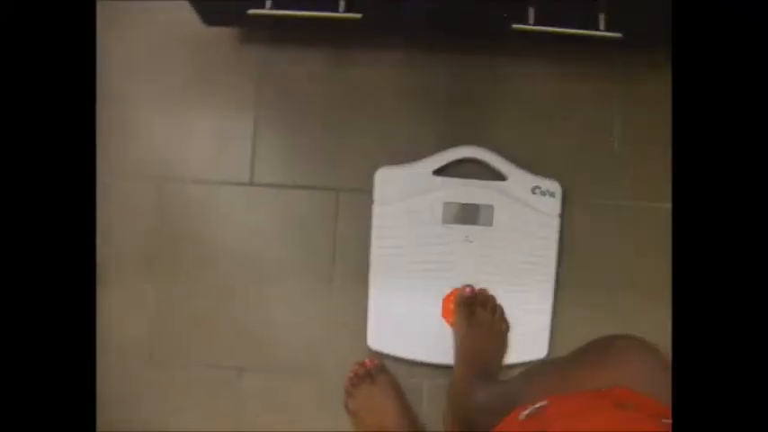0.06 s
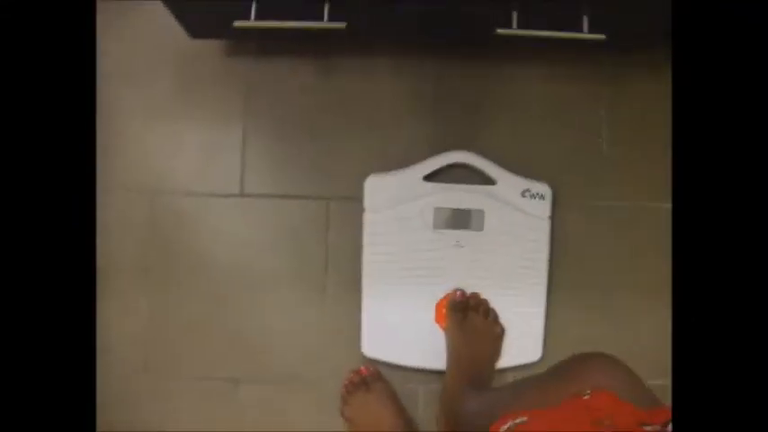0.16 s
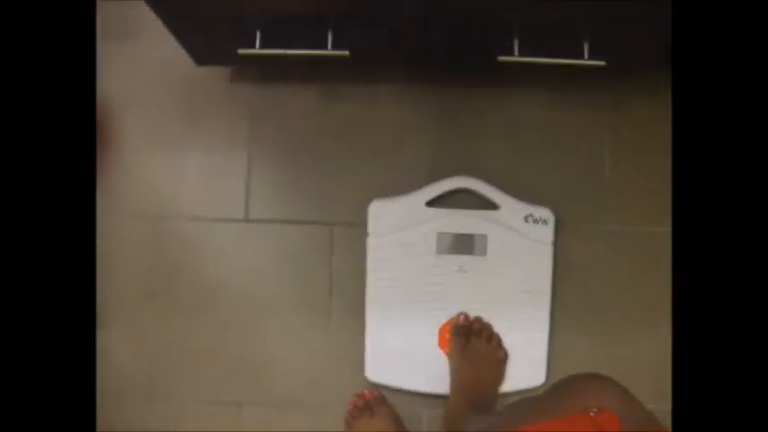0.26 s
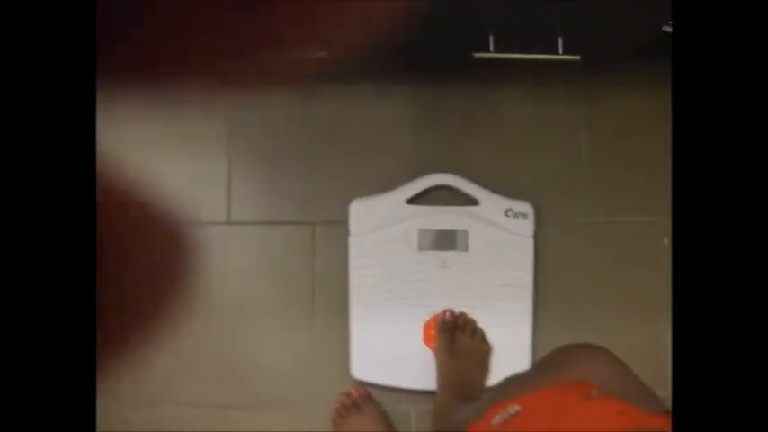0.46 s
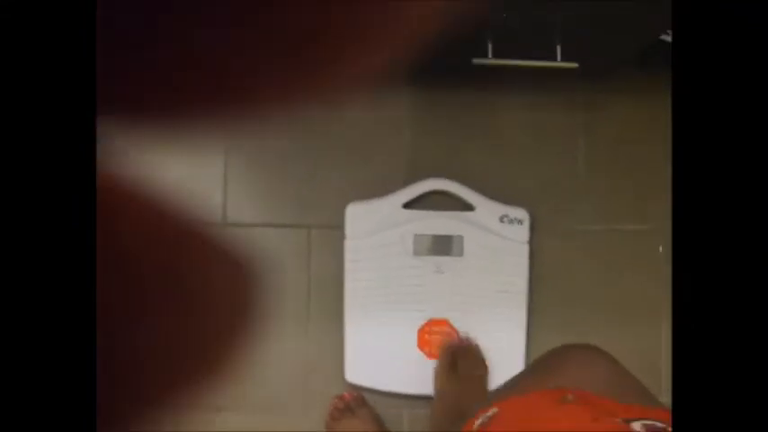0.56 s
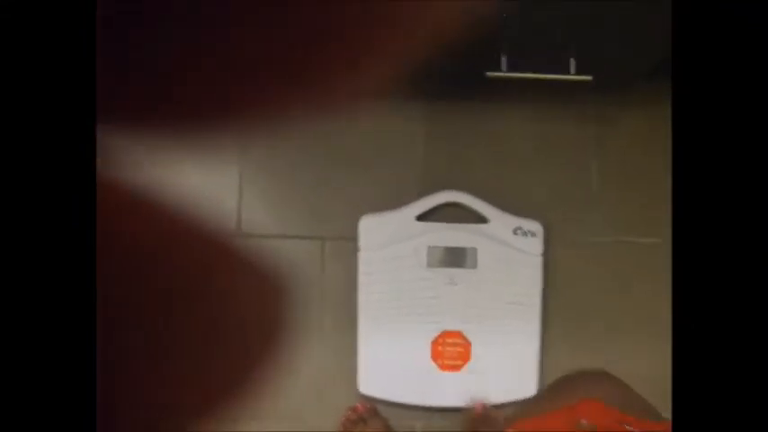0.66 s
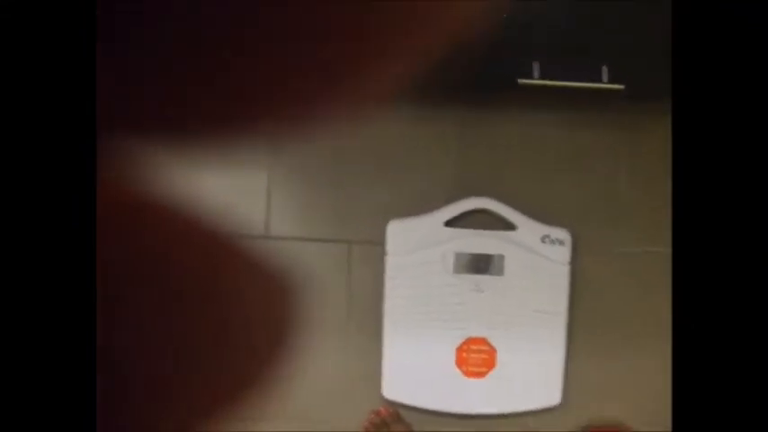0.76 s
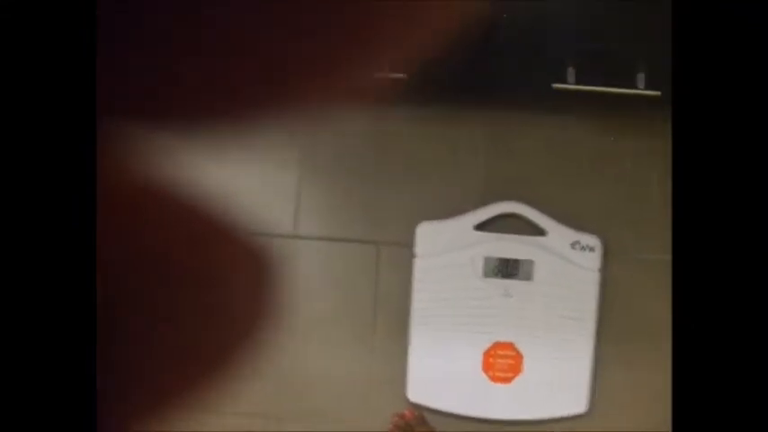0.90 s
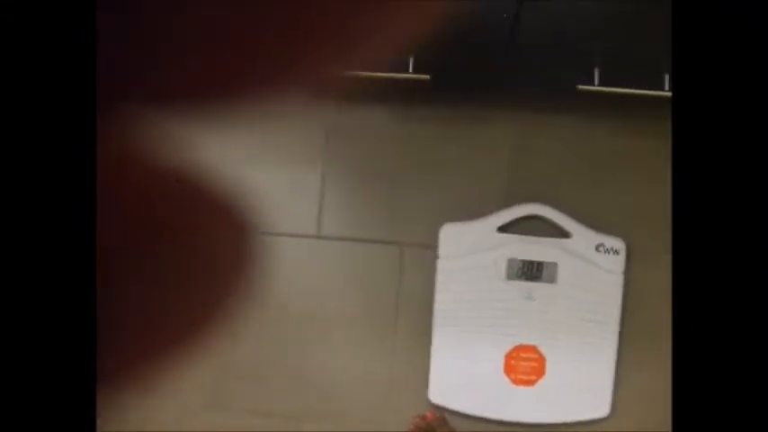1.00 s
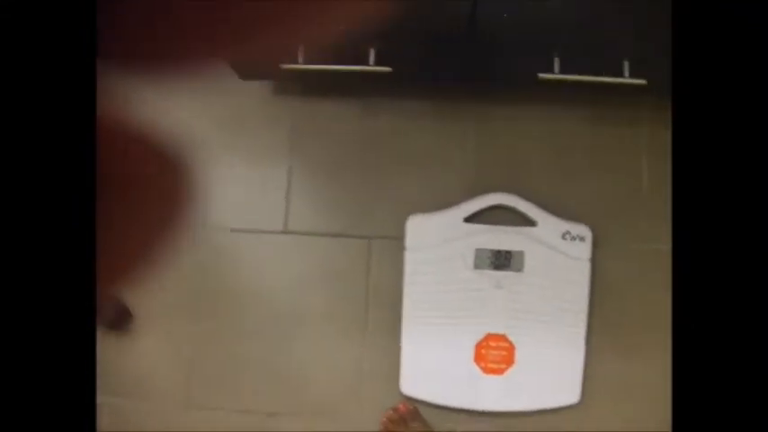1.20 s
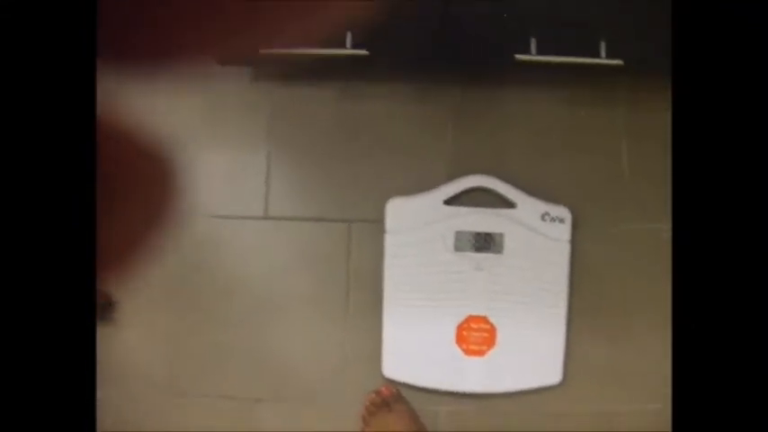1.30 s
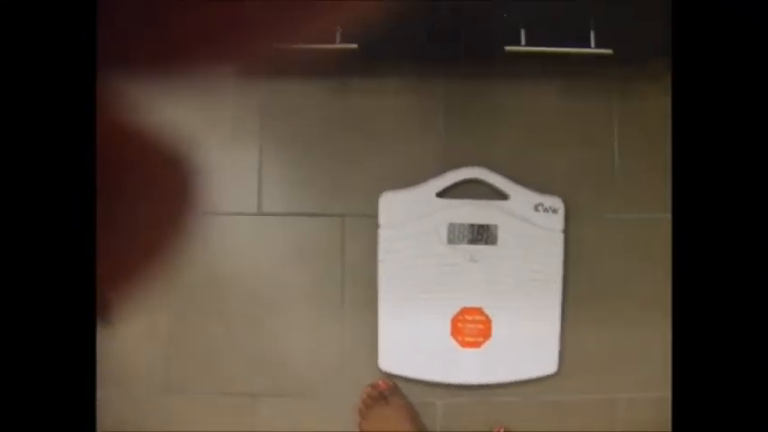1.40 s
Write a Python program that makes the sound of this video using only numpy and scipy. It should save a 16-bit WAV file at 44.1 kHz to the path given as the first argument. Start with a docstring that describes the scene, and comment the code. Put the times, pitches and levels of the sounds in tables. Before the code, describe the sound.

A bare foot taps a plastic bathroom scale, which clacks and then briefly rattles.

```python
"""A small, hard room with a tiled floor: a bare foot taps a plastic bathroom scale. The case clacks
down in a few quick contacts that ring its modes, the foot shifts on it, and the case rattles as the
foot lifts off. Small knocks and rubs of skin sound close to the microphone. The room rings after
each blow, over a faint electric hum and hiss."""
import sys
import numpy as np
from scipy import signal
from scipy.fft import rfft, irfft
from scipy.io import wavfile

SR = 44100
rng = np.random.default_rng(int(sys.argv[2]) if len(sys.argv) > 2 else 0)


def store_wav(level_fs):
    """Save 16-bit WAV to argv[1]."""
    pcm = np.round(np.clip(np.atleast_2d(level_fs), -1, 1) * 32767)
    wavfile.write(sys.argv[1], SR, pcm.T.astype(np.int16))


N = 63945


def amp(db):
    """Decibels to gain."""
    return 10 ** (np.asarray(db) / 20)


def unit(x):
    """Scales to rms 1."""
    return x / np.sqrt(np.mean(x ** 2) + 1e-20)


def curve_at(points, hz):
    """Reads a curve on a log-frequency axis."""
    f, value = np.transpose(points)
    return np.interp(np.log(hz + 1), np.log(f + 1), value)


def add(mix, s, sound):
    """Mixes a sound in at time s."""
    part = mix[max(round(s * SR), 0):][:len(sound)]
    part += sound[:len(part)]


def colour(x, eq, top_hz=8300):
    """Shapes x with an EQ curve, cut off at top_hz, at rms 1."""
    hz = np.fft.rfftfreq(len(x), 1 / SR)
    return unit(irfft(rfft(x) * amp(curve_at(eq, hz)) * (hz < top_hz), len(x)))


def fade(t, t60):
    """Exponential decay, 60 dB down at t60."""
    return np.exp(-np.log(1000) * t / t60)


def ring(modes, travel_s=0):
    """Struck modes; bending waves bring the high ones first, taking travel_s at 1 kHz."""
    out = np.zeros(SR // 2)
    for hz, db, t60 in modes:
        t = np.maximum(np.arange(len(out)) / SR - travel_s * np.sqrt(1000 / hz), 0)
        out += amp(db) * fade(t, t60) * np.sin(2 * np.pi * hz * t)
    return out


def burst(eq, t60):
    """A short dying puff of coloured noise."""
    t = np.arange(SR // 2) / SR
    return colour(rng.standard_normal(len(t)), eq) * fade(t, t60)


def slips(per_s, spread_db):
    """A random train of tiny slips of uneven size."""
    size = amp(spread_db * np.minimum(rng.exponential(1, N), 3))
    return unit(size * rng.choice([-1, 1], N) * (rng.random(N) < per_s / SR))


# EQ of the noise bed: f/Hz, relative level/dB
HISS_EQ = [(20, 9), (40, -24.5), (100, -8), (150, -12.5), (220, -6), (330, -5.5), (430, -4), (560, -12),
           (900, -14), (2000, -19), (4000, -20.5), (7500, -21)]
def hiss():
    """A steady bed of air and microphone hiss."""
    return amp(-45) * colour(rng.standard_normal(N), HISS_EQ)


# hum tones, mains fundamental first: f/Hz, level/dB
HUM_TONES = [(59.2, -48.5), (199.2, -62), (296.1, -48), (317.6, -71.5), (421, -57), (839.8, -67.5)]
# slow level change of the upper tones: t/s, gain/dB
HUM_LEVEL_CURVE = [(0, -0.5), (.6, -2.5), (.8, 0), (1.45, 1.8)]
def hum(waver_depth=0.12, waver_hz=2.3):
    """A steady mains hum whose upper tones waver in level and phase."""
    t, hz = np.arange(N) / SR, np.fft.rfftfreq(N, 1 / SR)
    slow = np.exp(-(hz / waver_hz) ** 2)
    ride = amp(np.interp(t, *np.transpose(HUM_LEVEL_CURVE)))
    out = np.zeros(N)
    for k, (tone_hz, db) in enumerate(HUM_TONES):
        swell, drift = (unit(irfft(rfft(rng.standard_normal(N)) * slow, N)) for _ in range(2))
        waver = (1 + waver_depth * (swell + 1j * drift)) * ride if k else 1
        tone = np.exp(2j * np.pi * (tone_hz * t + rng.random()))
        out += np.sqrt(2) * amp(db) * (waver * tone).real
    return out


# decay of the reverb tail: f/Hz, t60/s
TAIL_DECAY = [(200, 0.57), (500, 0.4347), (1400, 0.41), (3000, 0.47), (7500, 0.36)]
# EQ of the tail: f/Hz, gain/dB
TAIL_EQ = [(100, -19), (230, 2), (380, -4), (520, 2), (680, -3), (950, 1.5), (1450, 1), (1900, -2),
           (3200, -2), (7500, -5)]
# standing waves of the room: f/Hz, level/dB, t60/s
ROOM_MODES = [(235, -61.5, 0.75), (466, -57, 0.31), (565, -54, 0.31), (883, -72, 0.53), (943, -57, .38),
              (1129, -55, 0.35), (1475, -60, 0.58)]
# early reflections off cabinets and walls: t/s, level/dB
REFLECTIONS = [(0.0116, -16), (.029, -16), (0.0392, -15)]
def room(send, predelay_s=0.008, build_s=0.01):
    """The tiled room's reverb: a diffuse tail, standing waves and early reflections."""
    t = np.arange(SR) / SR
    hz, when, noise = signal.stft(rng.standard_normal(SR), SR, nperseg=256)
    decay = fade(when, curve_at(TAIL_DECAY, hz)[:, None])
    tail = signal.istft(noise * decay, SR, nperseg=256)[1][:SR]
    tail *= np.minimum(t / build_s, 1)
    tail *= amp(-6.5) / np.linalg.norm(tail)
    eq = amp(curve_at(TAIL_EQ, np.fft.rfftfreq(SR, 1 / SR)))
    response = np.zeros(SR)
    add(response, predelay_s, irfft(rfft(tail) * eq, SR)[:SR // 2])
    add(response, predelay_s, ring(ROOM_MODES))
    for delay_s, db in REFLECTIONS:
        add(response, delay_s, amp(db) * np.hanning(15) / 7)  # a rounded pulse dulls the echo
    return signal.fftconvolve(send, response)[:N]


# rub cues: peak t/s, half length/s, level/dB, tilt/(dB per octave)
RUB_CUES = [(0.296, 0.021, -44, 4), (0.338, .026, -46, .5), (0.454, 0.046, -47.5, -3),
            (0.905, 0.0064, -49, 0), (0.945, 0.0059, -49, -0.5)]
# EQ of sliding skin: f/Hz, relative level/dB
RUB_EQ = [(300, -7), (1200, 6), (2000, -4.5), (3300, 4), (4600, 1.5), (7500, -2.5)]
def skin_rubs():
    """Skin slides in soft swells of fine grains, some brighter than others."""
    t, out = np.arange(N) / SR, np.zeros(N)
    for s, half_s, db, tilt_db in RUB_CUES:
        eq = [(hz, level + tilt_db * np.log2(hz)) for hz, level in RUB_EQ]
        swell = amp(db) * np.exp(-.5 * ((t - s) / half_s) ** 2)
        out += swell * colour(slips(per_s=2500, spread_db=2.5), eq)
    return out


# EQ of the tick: f/Hz, relative level/dB
TICK_EQ = [(200, 7.5), (1300, 13.5), (2000, -9.5), (3300, -0.5), (4600, 1), (7500, 3.5)]
def tick(db):
    """The bright noise transient on a knock or clack."""
    return amp(db) * burst(TICK_EQ, t60=0.039)


# knock cues: t/s, level/dB, f/Hz, t60/s, tick level/dB
KNOCK_CUES = [(0.0157, -32, 680, .02, -33), (0.058, -27.5, 577, 0.021, -55),
              (0.2725, -42, 604, 0.0085, -41.5), (0.2821, -29, 524, 0.011, -40),
              (.5048, -27.5, 485, 0.028, -57.5)]
def knocks():
    """Small close knocks, each one damped mode topped with a tick."""
    out = np.zeros(N)
    for s, db, hz, t60, tick_db in KNOCK_CUES:
        add(out, s, tick(tick_db) - ring([(hz, db, t60)]))
    return out


# body of the clack: f/Hz, level/dB, t60/s
CLACK_MODES = [(305, -23.5, 0.032), (832, -17.5, 0.016), (1130, -28.5, 0.014), (1370, -32, 0.012)]
def shift_clack():
    """The shifting foot sets off one dry clack: a tick over a few short modes."""
    out = np.zeros(N)
    add(out, s=0.3087, sound=tick(db=-29.5) - ring(CLACK_MODES))
    return out


# modes of the plastic case: f/Hz, tapped level/dB, t60 underfoot/s, rattling level/dB
CASE_MODES = [(232.4, -7, 0.064, -15), (411, -17.5, .07, -28), (474.7, -4, 0.034, -1.5),
              (530, -12, 0.054, -10.5), (664, -14.5, 0.054, -4.5), (714, -35.5, .018, -31.5),
              (823, -5.5, 0.022, -3), (934, -12.5, 0.034, -15), (1107, -19.5, 0.051, -13),
              (1197, -14.5, .035, -19.5), (1254, -10, 0.013, -19.5), (1399, -19, 0.039, -28),
              (1433, -25, 0.067, -20.5), (1634, -22, .045, -15)]
def case_ring(underfoot, free_stretch=1.66):
    """The body tone of the case: damped under the foot, ringing longer once unloaded."""
    if underfoot:
        return ring([row[:3] for row in CASE_MODES], travel_s=0.00044)
    return ring([(hz, db, t60 * free_stretch) for hz, _, t60, db in CASE_MODES])


# envelope of the rattle: t/s, level/dB
RATTLE_ENVELOPE = [(.516, -40.5), (0.526, -35), (0.531, -30.5), (0.543, -24), (0.554, -26.5), (.568, -31.5),
                   (.584, -36.5), (.6, -63)]
# EQ of its grit: f/Hz, relative level/dB
GRIT_EQ = [(150, -36), (450, -0.5), (1200, 6), (2000, -2.5), (3600, -5.5), (4500, -12.5), (7500, -18)]
def lift_rattle():
    """The case chatters as the foot lifts: dense slips ring its modes and add a layer of grit."""
    t = np.arange(N) / SR
    s, db = np.transpose(RATTLE_ENVELOPE)
    envelope = amp(np.interp(t, s, db)) * ((t > s[0]) & (t < s[-1]))
    chatter = slips(per_s=3000, spread_db=3.5)
    body = case_ring(underfoot=False)
    ringing = signal.fftconvolve(chatter * envelope, body / np.linalg.norm(body))[:N]
    grit = envelope * colour(chatter, GRIT_EQ)
    return amp(-6) * ringing + amp(-2) * grit


# hits within the tap: t/s, body level/dB, force centre f/Hz, force width/octaves, crack level/dB
TAP_HITS = [(0.1033, -8, 860, 1.18, -10), (0.1071, 3, 1065, 1.37, -4), (0.1136, 0.8, 626, 1.77, -8),
            (.12008, -7.4, 898, 1.3, -15)]
# EQ of the crack, the dense upper modes of the case: f/Hz, relative level/dB
CRACK_EQ = [(200, -29.5), (500, 0.5), (1600, 5), (1850, -15.5), (3000, -8.5), (4000, -19), (7500, -25)]
def foot_tap(crack_trim_db=-10):
    """The case clacks down: each contact rings the modes its force reaches, with a brief crack."""
    out, body = np.zeros(N), case_ring(underfoot=True)
    for s, db, centre_hz, octaves, crack_db in TAP_HITS:
        edges_hz = centre_hz * 2 ** (octaves * np.array([-.5, .5]))
        force_band = signal.butter(2, edges_hz, "band", fs=SR, output="sos")
        add(out, s, amp(db) * signal.sosfilt(force_band, body))
        add(out, s, amp(crack_db + crack_trim_db) * burst(CRACK_EQ, t60=0.054))
    return out


def scene():
    """The scale, the drier close sounds and their reverb, thinned in the bass, over hiss and hum."""
    scale = foot_tap() + lift_rattle()
    close = knocks() + shift_clack() + skin_rubs()
    reverb = room(scale + amp(-7.5) * close)
    low_cut = signal.butter(4, 188.5, "high", fs=SR, output="sos")  # a microphone with little bass
    return (signal.sosfilt(low_cut, scale + close + reverb) + hiss() + hum())[None]


def record(dry):
    """A steep high cut: the band limit of a small camera."""
    high_cut = signal.firwin(201, 7800, window=("kaiser", 8), fs=SR)
    return signal.oaconvolve(dry, high_cut[None], "same")


dry = scene()
out = record(dry)
store_wav(out)
```